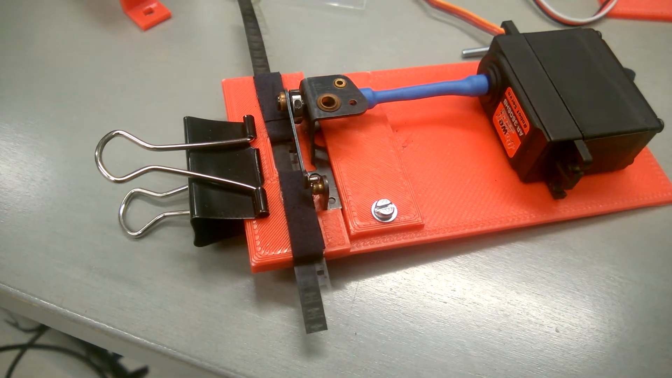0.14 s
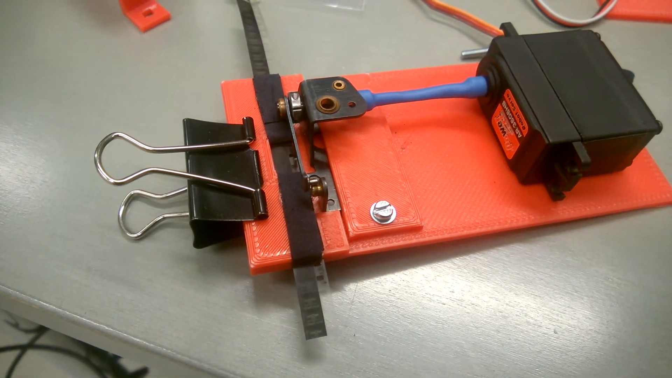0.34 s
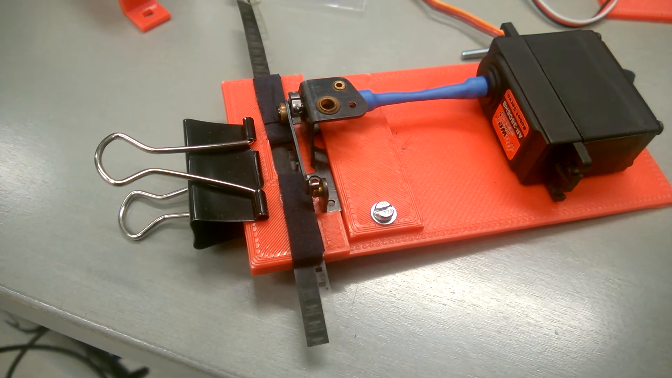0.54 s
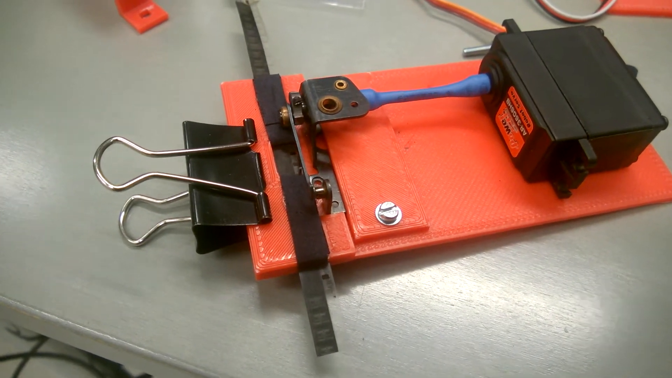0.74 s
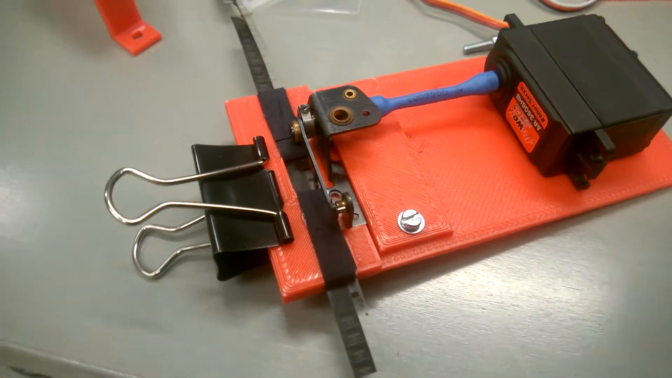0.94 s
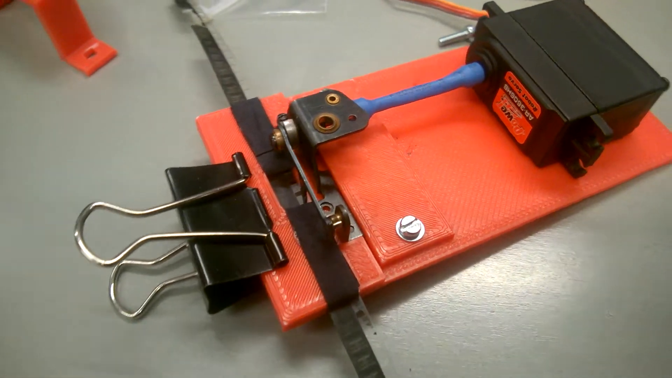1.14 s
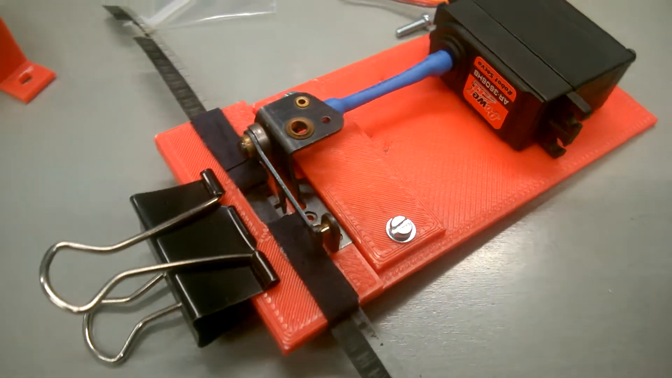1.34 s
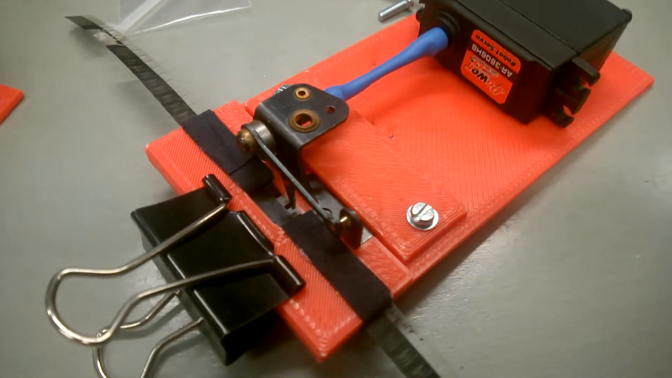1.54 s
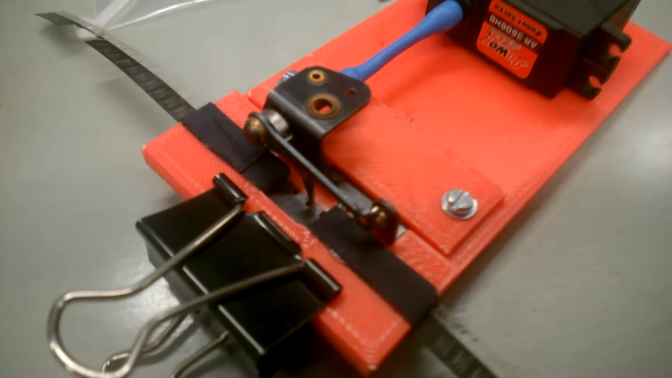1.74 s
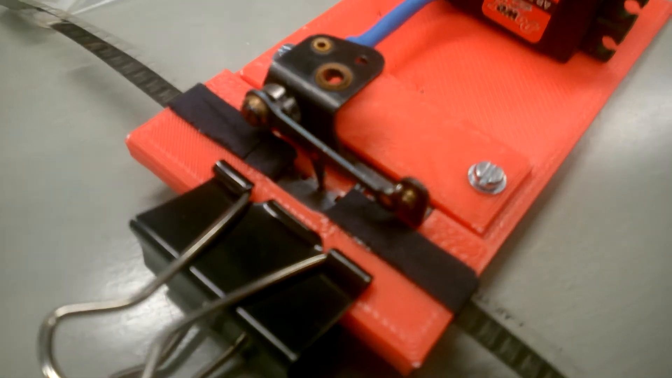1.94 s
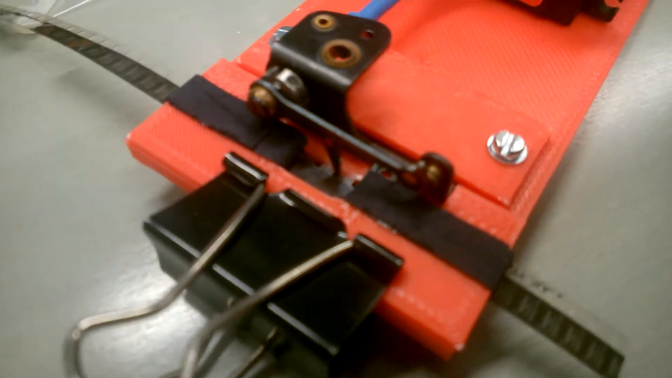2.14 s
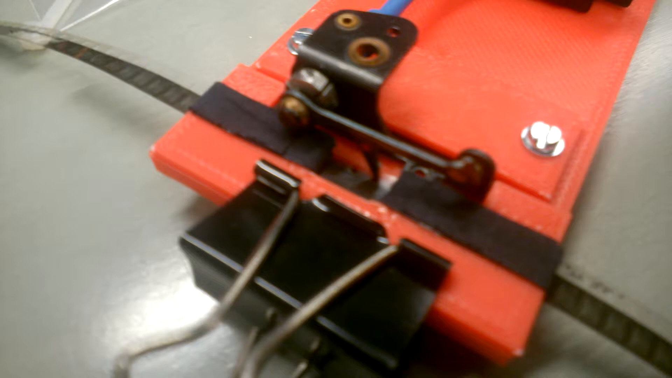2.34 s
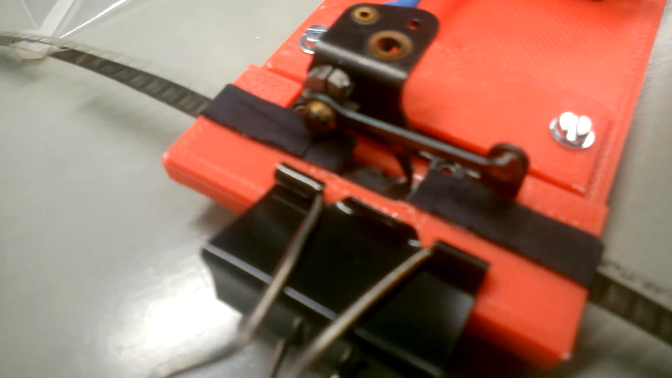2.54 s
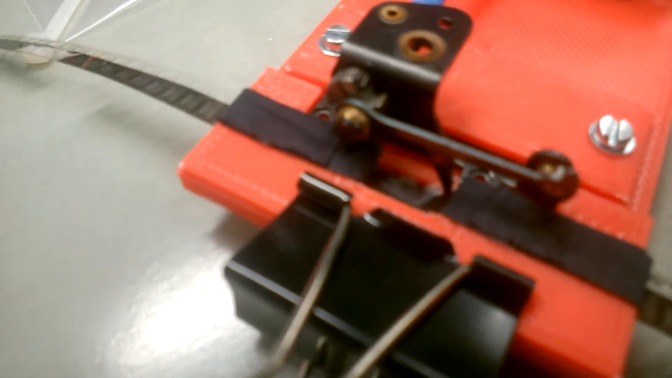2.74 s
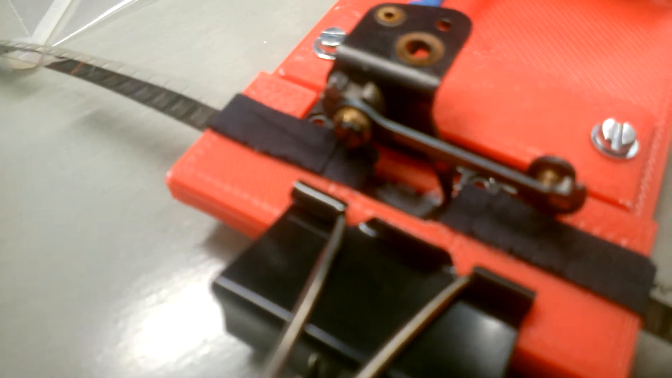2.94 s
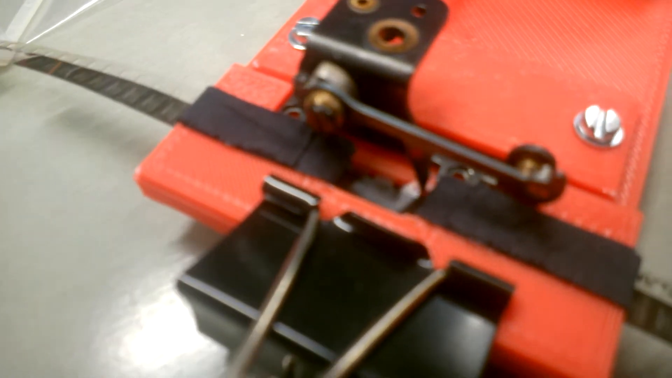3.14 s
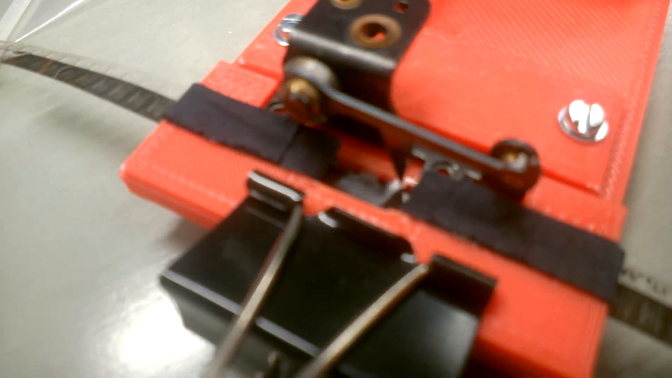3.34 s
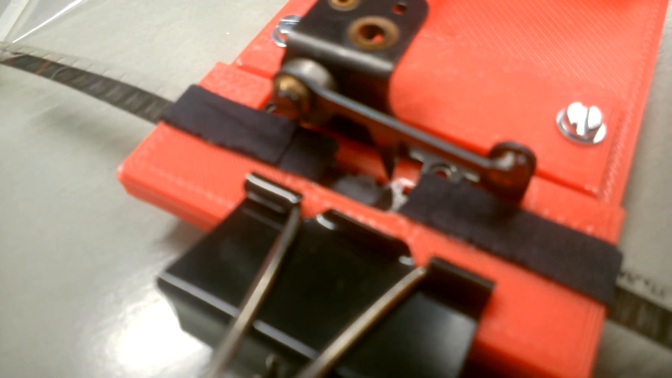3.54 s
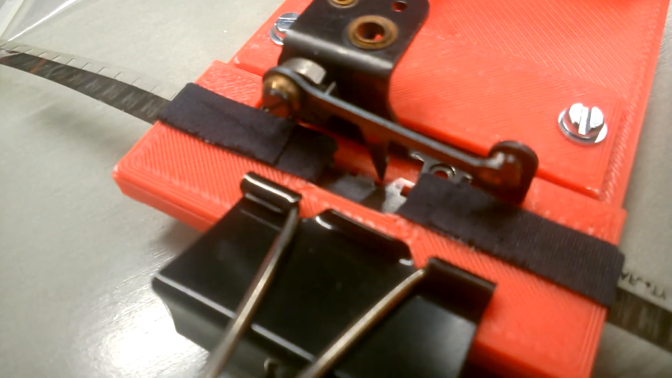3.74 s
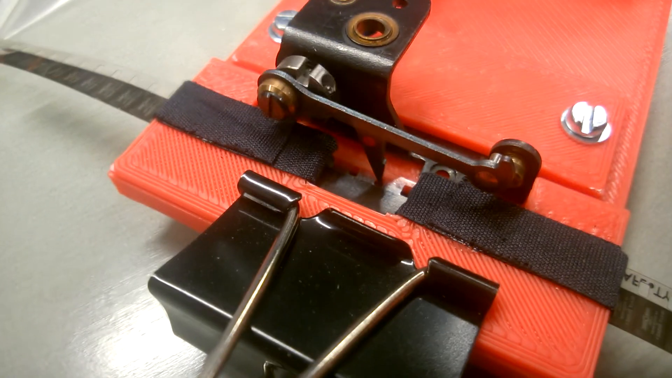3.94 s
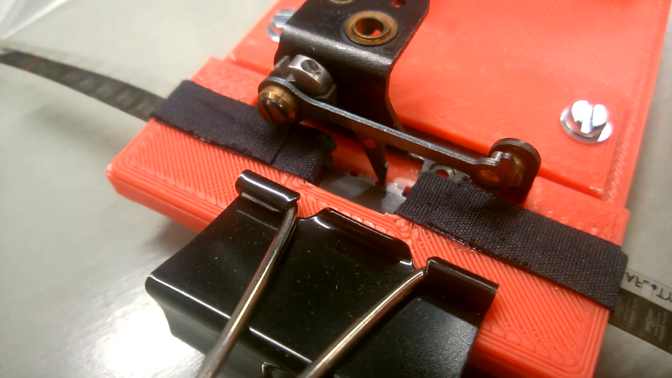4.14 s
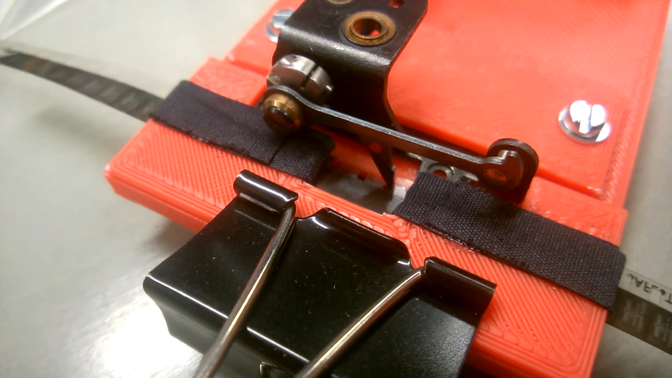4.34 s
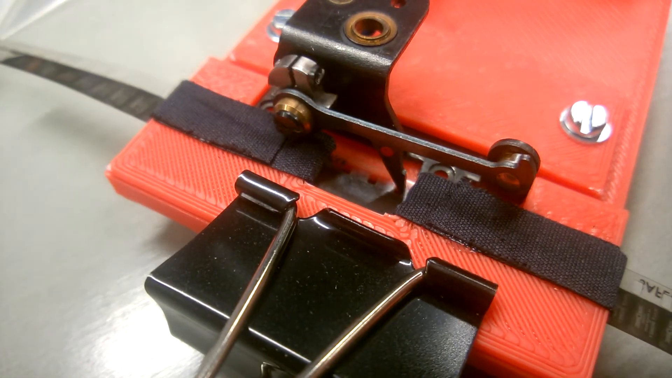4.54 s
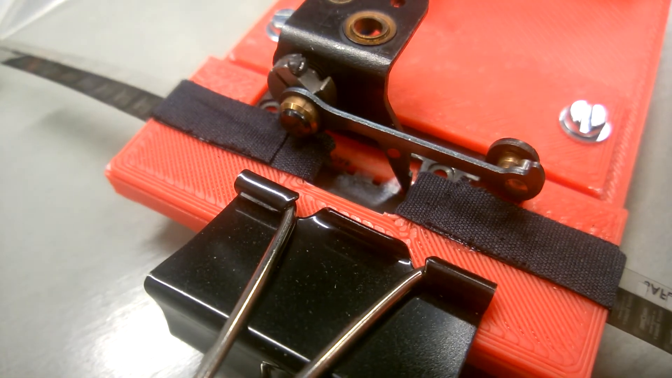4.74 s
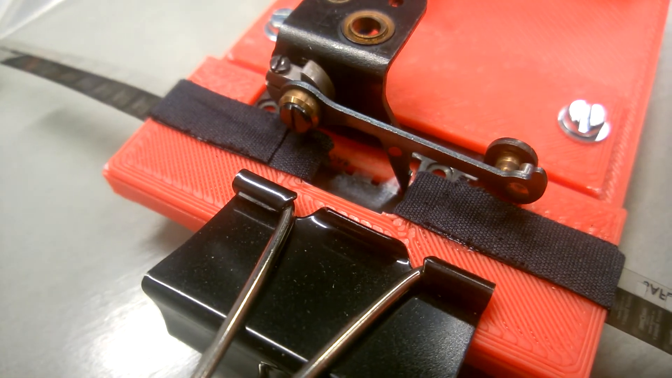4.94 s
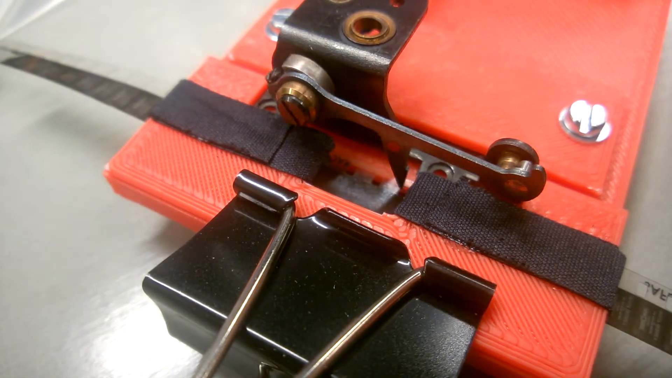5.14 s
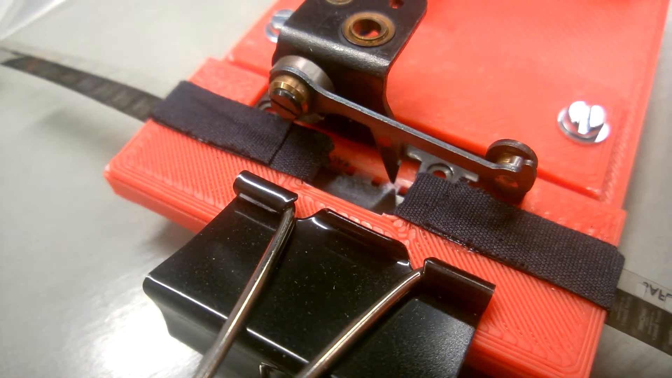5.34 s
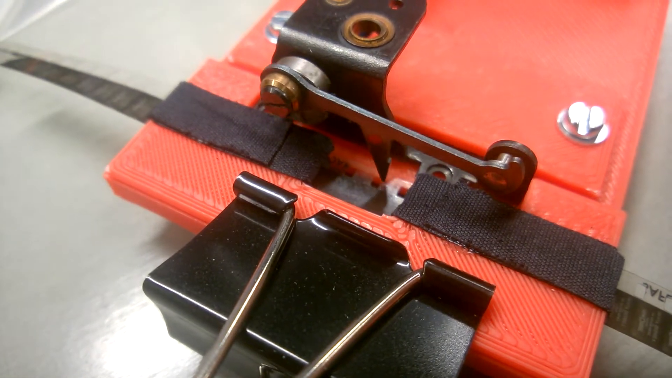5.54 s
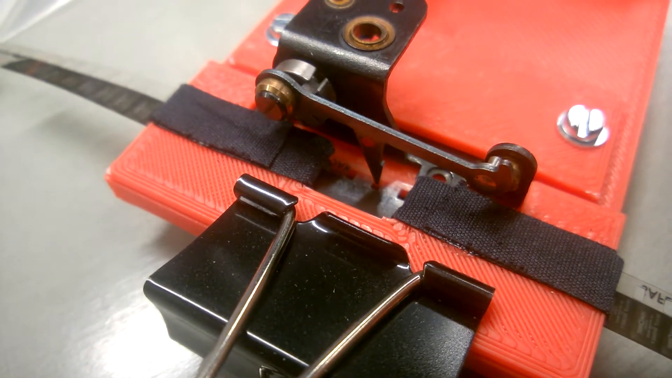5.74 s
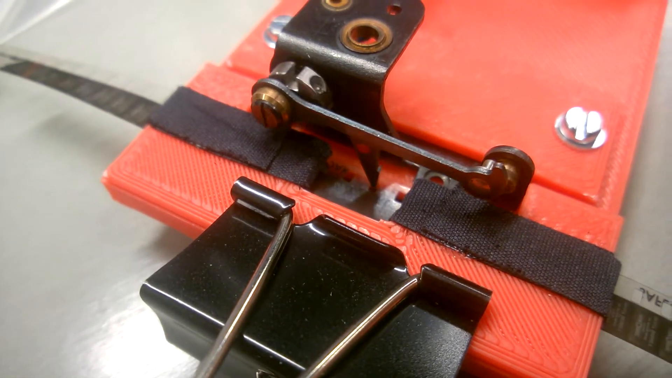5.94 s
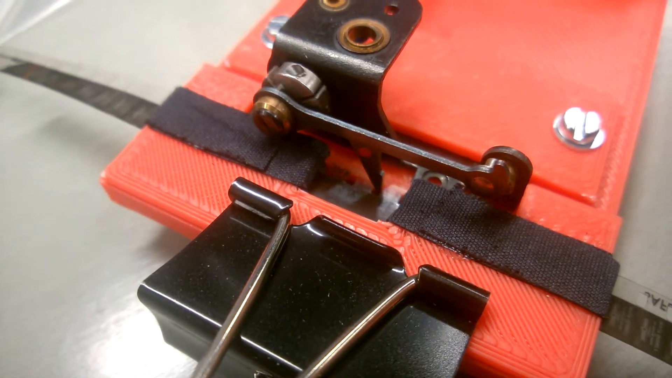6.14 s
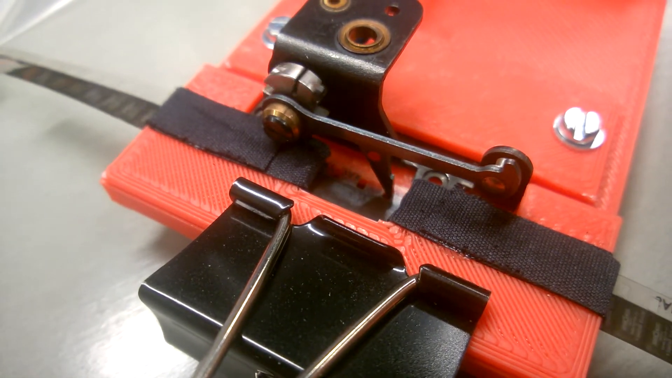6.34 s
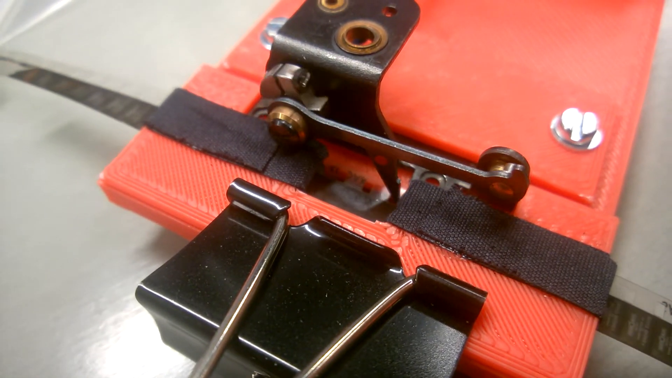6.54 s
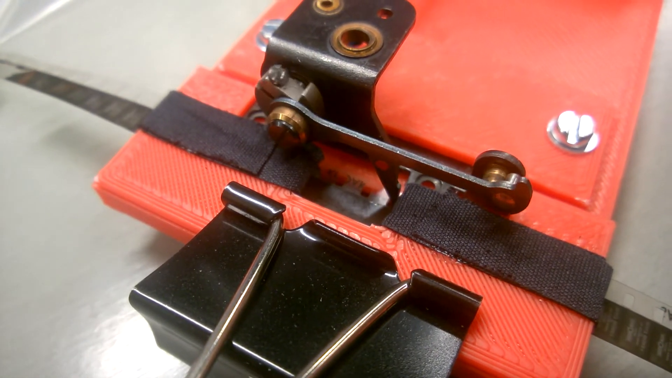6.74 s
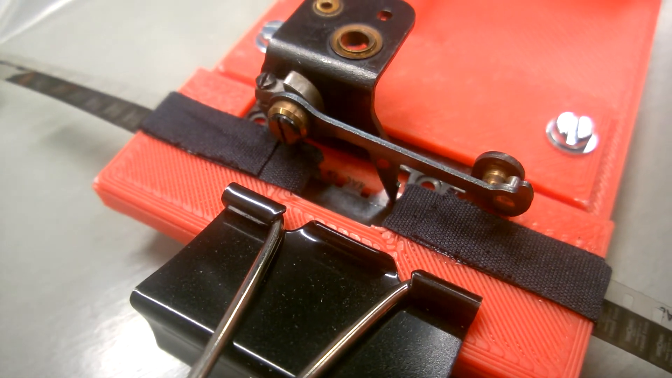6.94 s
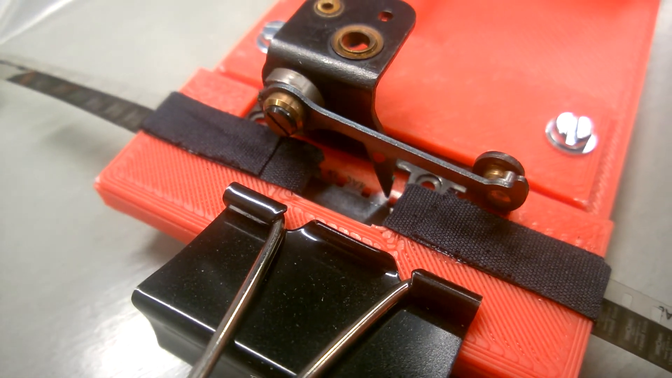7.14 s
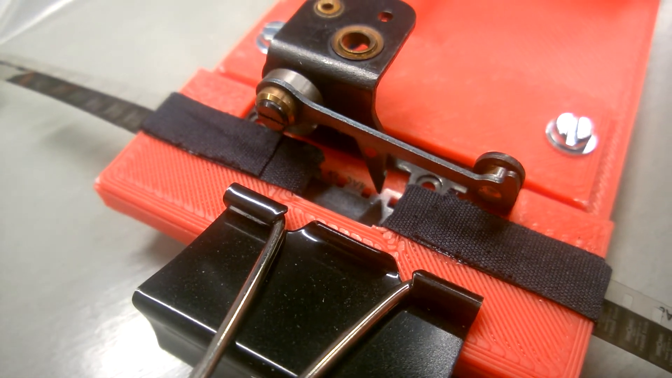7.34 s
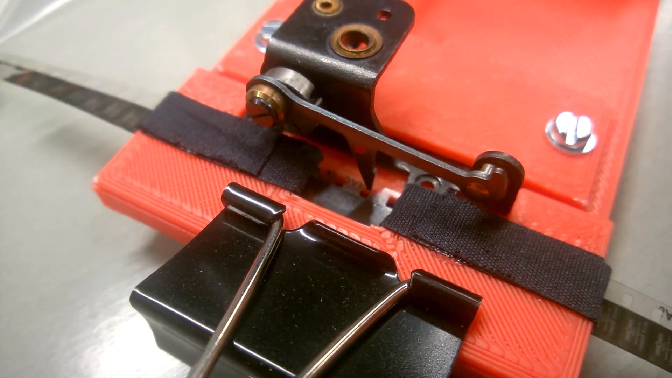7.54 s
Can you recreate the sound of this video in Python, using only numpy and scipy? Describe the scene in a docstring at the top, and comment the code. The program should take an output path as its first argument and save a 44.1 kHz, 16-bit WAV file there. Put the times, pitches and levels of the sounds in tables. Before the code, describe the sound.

A small geared motor whirs continuously with a bright, raspy plastic buzz over low ventilation rumble, growing closer amid a few creaks and handling clicks.

```python
"""A distant gear whirr over ventilation rumble, then the same whirr close up, with a few rubs and creaks of the
grip. A small servo turns a linkage on a workbench: tooth blows of a 12-tooth pinion on a 47-tooth wheel, and a
steady grind, ring the modes of a plastic case. A hand-held pair of microphones swings round and comes close.
Clicks and friction noise ring the housing modes under the hand; the room air is coloured noise in layers, with
low swells rising through it now and then."""
import sys
import numpy as np
from scipy import signal
from scipy.fft import rfft, irfft, next_fast_len
from scipy.io import wavfile
from scipy.ndimage import uniform_filter1d

SR = 44100
rng = np.random.default_rng(int(sys.argv[2]) if len(sys.argv) > 2 else 0)


def store_pcm(level_fs):
    """Save levels as 16-bit WAV."""
    pcm = np.round(np.clip(level_fs, -1, 1) * 32767).astype(np.int16)
    wavfile.write(sys.argv[1], SR, np.atleast_2d(pcm).T)


N = 334719


def from_db(db):
    """dB to gain."""
    return 10 ** (np.asarray(db) / 20)


def rms_one(x):
    """Scale to rms 1."""
    return x / np.sqrt(np.mean(x ** 2) + 1e-20)


def in_time(rows):
    """Columns of a table, after its seconds, drawn as lines over every sample."""
    s, *columns = np.transpose(rows)
    return [np.interp(np.arange(N) / SR, s, c) for c in columns]


def resonate(x, hz, width_hz):
    """Complex one-pole resonance, gain 1 on top; a wider one dies away faster."""
    r = np.exp(-np.pi * width_hz / SR)
    return signal.lfilter([1 - r], [1, -r * np.exp(2j * np.pi * hz / SR)], x)


# Stereo image of the air. Each row: frequency in Hz, likeness of the two ports 0-1, left over right in dB.
PORT_IMAGE = [(30, 0.99, -7), (125, 0.95, -4), (300, 0.85, -6.5), (590, 0.68, -5.5), (1500, 1, -12.5)]


def air_noise(spectrum):
    """Stereo noise of a given colour, the likeness of the ports set by frequency; mid rms 1."""
    size = next_fast_len(N)
    log_hz = np.log(np.maximum(np.arange(size // 2 + 1) * SR / size, 1))
    hz, level_db = np.transpose(spectrum)
    port_hz, alike, pan_db = np.transpose(PORT_IMAGE)
    alike = np.interp(log_hz, np.log(port_hz), np.clip(alike, 0, 1))
    left_right = np.array([[1], [-1]])
    pan = from_db(np.interp(log_hz, np.log(port_hz), pan_db) / 2 * left_right)
    mid, side = rfft(rng.standard_normal((2, size)))
    both = pan * (np.sqrt(1 + alike) * mid + np.sqrt(1 - alike) * side * left_right)
    colour = from_db(np.interp(log_hz, np.log(hz), level_db, left=-90, right=-90))
    out = irfft(both * colour, size)[:, :N]
    return out / np.sqrt(np.mean(out.mean(axis=0) ** 2))


# Swells that rise through the low sound now and then. Each row: middle in seconds, then rumble, low air and
# middle air in dB, added in power to the floor.
AIR_SWELLS = [(.08, -50, -43, -59), (.42, -45, -46, -70), (.74, -59, -45.5, -57.5), (1.25, -60, -46.5, -77),
              (1.75, -42.5, -45.5, -57), (2.09, -64, -69, -55), (2.33, -43, -52, -62),
              (2.72, -43, -47.5, -78), (3.21, -43.5, -70, -76), (3.81, -32.5, -46.5, -58),
              (4.42, -43, -45.5, -59), (4.87, -43.5, -46.5, -75), (5.06, -54, -49.5, -84),
              (5.35, -47.5, -64, -85), (5.82, -38, -53, -79), (6.1, -43, -44, -59.5),
              (6.36, -40, -60, -55.5), (6.75, -46.5, -47.5, -72), (7.08, -45, -55, -66),
              (7.58, -49, -45, -76)]
SWELL_WIDTH_S = 0.065
RUMBLE_DB, LOW_AIR_DB, MIDDLE_AIR_DB = -48.5, -51, -61.5   # floors between swells, before wavering
SHARED_WAVER_DB, OWN_WAVER_DB, WAVER_PER_S = 1.5, 1.8, 4.7   # all layers together, each on its own


def air_levels():
    """Gains of rumble, low and middle air: a wavering floor with bell-shaped swells."""
    step = 100   # samples between drawn points
    s, *tops_db = np.transpose(AIR_SWELLS)
    t = np.arange(0, N + step, step) / SR
    bells = np.exp(-((t - s[:, None]) / SWELL_WIDTH_S) ** 2)
    r = np.exp(-2 * np.pi * step * WAVER_PER_S / SR)
    drift = signal.lfilter([1], [1, -2 * r, r * r], rng.standard_normal((4, len(t) + 500)))
    waver = rms_one(drift[:, 500:])   # the filter has settled by then
    floors_db = np.c_[[RUMBLE_DB, LOW_AIR_DB, MIDDLE_AIR_DB]]
    floors = from_db(floors_db + SHARED_WAVER_DB * waver[0] + OWN_WAVER_DB * waver[1:])
    gains = np.sqrt(floors ** 2 + from_db(tops_db) ** 2 @ bells)
    return [np.interp(np.arange(N) / SR, t, gain) for gain in gains]


# Colour of the room air, lower part. Each row: frequency in Hz, relative density in dB per Hz.
AIR_COLOUR = [(41, -11), (70, -1.5), (90, -8.5), (106, -2.5), (118, 4.5), (132, -5), (146, -16),
              (163, -5.5), (180, -12.5), (200, -18.5), (255, -14), (290, -18.5), (376, -28.5), (415, -24.5),
              (469, -26), (648, -33), (732, -33.5), (1000, -36.5)]
# Its upper part. Each row: frequency in Hz, relative density in dB per Hz.
AIR_TOP_COLOUR = [(1300, -36.5), (2500, -45), (6000, -40)]
# Colour of the deep rumble. Each row: frequency in Hz, relative density in dB per Hz.
DEEP_COLOUR = [(8, -37), (14, -13), (27, 2.5), (34, -13), (47, 0), (60, -20.5), (75, -11.5), (95, -40)]


def room_air():
    """A deep ventilation rumble with low and middle layers of air; swells rise through them now and then, each
    layer to its own level."""
    rumble_gain, low_gain, middle_gain = air_levels()
    air = air_noise(AIR_COLOUR + AIR_TOP_COLOUR)
    low = signal.sosfiltfilt(signal.butter(2, 210, fs=SR, output="sos"), air)
    rumble = rumble_gain * air_noise(DEEP_COLOUR)
    return low_gain * rms_one(low) + middle_gain * rms_one(air - low) + rumble


# Fingers sliding on the housing. Each row: middle in seconds, half length in seconds,
# level in dB before the housing rings.
FINGER_RUBS = [(0.095, 0.049, -71.5), (0.354, 0.028, -69.5), (0.794, 0.066, -70.5), (1.773, 0.16, -69.5),
               (2.043, 0.24, -68.5), (3.962, 0.046, -70)]
RUB_CUT_HZ = 470


def rubbing():
    """Dull friction noise under a bell for each slide of the fingers."""
    t = np.arange(N) / SR
    gain = sum(from_db(level_db) * np.exp(-((t - s) / half_s) ** 2) for s, half_s, level_db in FINGER_RUBS)
    return gain * signal.sosfilt(signal.butter(2, RUB_CUT_HZ, fs=SR, output="sos"), rng.standard_normal(N))


# Grip creaks. Each row: start in seconds, strike level in dB, thump over the strike in dB,
# dullness in dB per octave (positive favours the lower modes).
GRIP_CREAKS = [(.355, -52, -8, 10), (.742, -52, -4, 8), (.79, -50, -4, 13), (0.838, -40, -5, -4),
               (.925, -50, -5, 7), (1.933, -33.5, 0, 1), (2.0045, -32.5, -14, -1), (2.058, -36, -14, -6),
               (2.0744, -30, -2, -3), (2.1003, -30.5, -8, -2), (2.107, -32, -15, -2),
               (2.1155, -31, -19, -1.5), (2.1204, -40, -4, -7), (2.307, -41.5, 13, 0),
               (2.392, -53, -10, -4), (2.604, -44, -3, -3), (3.916, -52, -7, -3)]
# Housing modes. Each row: frequency in Hz, t60 in seconds, left in dB, right in dB,
# right polarity as a sign, lag in seconds.
HOUSING_MODES = [(455, 0.017, -2.5, -19, -1, 0.00093), (680, 0.016, -4.5, -12, -1, 0.0031),
                 (930, 0.012, -8, 1.5, 1, 0.002), (1135, 0.013, -1, -9, 1, 0.0017),
                 (1800, 0.0059, -5, -3.5, 1, 0)]
THUMP_HZ, THUMP_T60_S = 91, 0.032


def grip():
    """Creaks click into the housing modes, most of them answering late, with a thump; sliding fingers ring them too."""
    s, strike_db, thump_db, dull_db = np.transpose(GRIP_CREAKS)
    out, rub = np.zeros((2, N)), rubbing()
    modes = HOUSING_MODES + [(THUMP_HZ, THUMP_T60_S, 0, 0, 1, 0)]
    for hz, t60_s, left_db, right_db, polarity, lag_s in modes:
        clicks = np.full(N, 1e-18)
        colour_db = dull_db * np.log2(900 / hz) + rng.normal(0, 2.5, len(s))
        at = np.round((s + abs(lag_s)) * SR).astype(int)
        if hz == THUMP_HZ:
            clicks[at] = from_db(strike_db + thump_db)
        else:
            clicks[at] = -from_db(strike_db + colour_db)
        r, w = from_db(-60 / (t60_s * SR)), 2 * np.pi * hz / SR
        ringing = signal.lfilter([0, np.sin(w)], [1, -2 * r * np.cos(w), r * r], clicks + rub)
        out += ringing * from_db([[left_db], [right_db]]) * [[1], [np.sign(polarity)]]
    return out


# Spells when the motor labours at its lower speed. Each row: start in seconds, length in seconds.
LABOURED_SPELLS = [(.28, .17), (.8, .87), (2.18, .42), (2.78, .32), (4.07, .53), (5.22, .1), (6.55, .24)]
FREE_TEETH_PER_S, LABOURED_TEETH_PER_S, FIRST_TOOTH = 244, 240, 0.15


def teeth_meshed():
    """Times where the motor changes between its two speeds, and the teeth meshed by then."""
    start_s, length_s = np.transpose(LABOURED_SPELLS)
    s = np.sort(np.r_[0, start_s, start_s + length_s, N / SR])
    slow_s = np.clip(s[:, None] - start_s, 0, length_s).sum(axis=1)
    return s, FIRST_TOOTH + FREE_TEETH_PER_S * (s - slow_s) + LABOURED_TEETH_PER_S * slow_s


# Hardness of the pinion teeth. Each entry: one tooth in turn, in dB before the hardest level off.
PINION_HARDNESS = [-0.5, 1, 0.5, 1.5, -1, 3.5, 5, 3, 2, -0.5, -0.5, -0.5]
# One contact, the blow and its rebounds. Each row: delay in seconds, scatter of the delay in seconds,
# level in dB.
BLOW_AND_REBOUNDS = [(0, .00027, 0), (.0011, .0003, -1.5), (.0022, .0004, -11)]
# Single teeth that jam and land hardest. Each row: time in seconds, aimed peak in dB.
JAMMED_TEETH = [(2.1545, -9), (2.5212, -10), (2.7214, -9), (2.7762, -10), (2.9017, -12), (2.9517, -7),
                (3.0615, -8), (3.1216, -8.5), (3.1712, -11), (3.2695, -9.5), (3.5135, -8), (4.1054, -8.5),
                (4.9016, -5), (5, -6.5), (5.0473, -6.5), (5.0982, -7), (6.4279, -8.5), (6.6245, -11.5),
                (6.776, -13), (6.8248, -11)]
# Gear whirr as the microphones come close. Each row: time in seconds, level in dB.
WHIRR_LEVEL = [(0, -33.5), (.8, -34), (1.15, -31.5), (1.7, -28.5), (2.2, -26.5), (2.75, -27), (3.4, -28.5),
               (4.7, -28), (5.5, -28.5), (7.59, -28.5)]
WHEEL_TEETH, WHEEL_TIGHTEST, WHEEL_DB = 47, 12, 2   # the wheel runs off centre
RENUMBER_S, RENUMBER_TEETH = 2.38, 7   # tooth numbering moves on by seven here, keeping the wheel's beat steady
HARDEST_DB = 5   # the hardest contacts, jams apart, level off towards this
TOOTH_CREST_DB = 13.5   # assumed peak of a mean tooth over the level of the whirr
BEFORE_JAM_DB = -3.5   # the tooth before a jam lands a little softer


def tooth_contacts(spread_db, wander_db):
    """Sample and size of every blow and rebound, one row per tooth; an off-centre wheel meshes harder once a turn."""
    s, meshed = teeth_meshed()
    teeth = np.arange(np.ceil(meshed[0]), np.floor(meshed[-1]))
    start_s = np.interp(teeth - .2, meshed, s)
    index = (teeth + RENUMBER_TEETH * (start_s > RENUMBER_S)).astype(int)
    wheel_db = WHEEL_DB * np.cos(2 * np.pi * (index - WHEEL_TIGHTEST) / WHEEL_TEETH)
    delay_s, jitter_s, step_db = np.transpose(BLOW_AND_REBOUNDS)
    chance = np.clip(rng.standard_normal((len(teeth), 3, len(BLOW_AND_REBOUNDS))), -1.6, 1.6)
    wander = rms_one(signal.lfilter([1], [1, -.8], chance[:, 2, 0]))   # backlash wanders over a few teeth
    hard_db = np.array(PINION_HARDNESS)[index % len(PINION_HARDNESS)] + wheel_db + wander_db * wander
    hard_db = np.minimum(hard_db, HARDEST_DB * np.tanh(hard_db / HARDEST_DB))

    # the nearest tooth takes over the time and size of each jam
    jolt_s, jolt_db = np.transpose(JAMMED_TEETH)
    jammed = np.abs(start_s[:, None] - jolt_s).argmin(axis=0)
    start_s[jammed] = jolt_s
    hard_db[jammed] = jolt_db - TOOTH_CREST_DB - np.interp(jolt_s, *np.transpose(WHIRR_LEVEL))
    hard_db[jammed - 1] += BEFORE_JAM_DB
    chance[jammed, :2, 0] = 0   # no scatter in time or size on its first blow

    at = (start_s[:, None] + delay_s + jitter_s * chance[:, 0]) * SR
    size_db = hard_db[:, None] + step_db + spread_db * chance[:, 1]
    return np.clip(at, 0, N - 1).astype(int), from_db(size_db)


def in_step(x, reply):
    """Phases set so that a blow with this reply gives its energy as early as it can (minimum phase)."""
    spectrum = rfft(reply) + 1e-9
    cepstrum, half = irfft(np.log(np.abs(spectrum))), len(reply) // 2
    cepstrum[1:half] *= 2
    cepstrum[half + 1:] = 0
    early_phase = rfft(cepstrum).imag
    turn = np.roll(irfft(np.exp(1j * (early_phase - np.angle(spectrum)))), half)
    return signal.fftconvolve(x, turn[None], axes=1)[:, half:half + N]


# Passing dips in the whirr, some of them gliding. Each row: middle in seconds, half length in seconds,
# frequency at the middle in Hz, glide in Hz per second, width in Hz, depth 0-1.
PASSING_DIPS = [(1.5, 0.52, 5360, -150, 300, .75), (1.74, 0.43, 8200, 300, 240, .65),
                (2.34, 0.13, 7400, 4, 1000, 0.77), (1.2, 0.75, 7600, 0, 180, 0.13)]


def passing_dips(x):
    """Each dip is a notch that fades in and out, its frequency moving at its own glide rate."""
    t = np.arange(N) / SR
    for s, half_s, hz, glide, width_hz, depth in PASSING_DIPS:
        carrier = np.exp(2j * np.pi * (hz * t + glide * (t - s) ** 2 / 2))
        band = 2 * (resonate(x / carrier, 0, width_hz) * carrier).real
        fade = np.exp(-((t - s) / half_s) ** 4)
        x = x - np.clip(depth, 0, 1) * fade * band
    return x


# Modes of the case and base plate. Each row: frequency in Hz, width in Hz of the first resonance pass.
CASE_MODES = [(1125, 115), (2070, 310), (2430, 120), (2710, 230), (3450, 300), (3720, 450), (4300, 540),
              (4970, 570), (5840, 410), (6310, 260), (6650, 330), (7280, 420), (7850, 620), (8700, 710),
              (9220, 370), (9570, 660), (10360, 700), (11720, 600), (12320, 890), (13480, 780)]
# The case modes heard from far off. Each row, one per mode: left in dB, right in dB, right lead in radians.
FAR_MODES = [(-31, -36, 1), (-18.5, -21, -1.6), (-5.5, -12.5, 1), (-4.5, -14, -1.5), (-3, -14.5, 2.5),
             (-13.5, -30, 3.5), (-7, -31, 2), (-12, -7.5, -2.5), (-6.5, -6, -2.5), (-17, -5, 2),
             (-2.5, -17, -0.5), (-3.5, 2.5, 4), (-22, -0.5, 2.5), (-17, -8.5, -0.0), (-10.5, -15, -2),
             (-22, -10.5, 1.1), (-34, -41, -1), (-49, -34, -0.9), (-39, -26, -1.5), (-54, -37, 0.5)]
# The same while swinging round. Each row: left in dB, right in dB, right lead in radians.
SWINGING_MODES = [(-37, -32.5, 3.7), (-20.5, -28, -2), (-4, -14, 1.5), (-6.5, -19.5, -2), (-5, -22, 7.5),
                  (-14.5, -33, 4), (-4, -15, 1.3), (-6, -11.5, 4.5), (-24, -11, -2.5), (-4, -9, 3.5),
                  (1.5, -9, -3.5), (-3.5, -29, 2), (-23, -7, -0.5), (-13, -22, 2), (-14.5, -21, 0.5),
                  (-23, -36, -2), (-59, -23.5, 1.5), (-40, -36, 4), (-59, -72, -3.5), (-65, -67, -2)]
# The same on arriving. Each row: left in dB, right in dB, right lead in radians.
ARRIVING_MODES = [(-29.5, -30.5, 1), (-28, -27.5, 0.5), (-9, -11.5, -0.7), (-6, -15, -1), (-6.5, -19, 1.1),
                  (-22, -27, -0.5), (-5.5, -14, 1.5), (-4.5, -22, 2.8), (-15, -2.5, 0.88), (1, -3.5, 0.5),
                  (-2, -1.5, 1.44), (1, 0, -1.5), (-9.5, -33, 2.5), (-13.5, -8.5, 1.5), (-7, -12.5, 2),
                  (-21, -11, 3.6), (-13.5, -27, 4), (-23, -20, 1.3), (-27, -32, 0.5), (-34.5, -30, 4)]
# The same close up. Each row: left in dB, right in dB, right lead in radians.
NEAR_MODES = [(-26, -27, 0.58), (-27.5, -24.5, -0.5), (-7, -12, -0.6), (-4.5, -15.5, 0.5),
              (-5.5, -16.5, 0.8), (-13.5, -22.5, 0), (-3.5, -16.5, 3), (-4.5, -14, -1), (-8, -2.5, -1),
              (0, 0, -1.67), (-4.5, -4.5, -0.5), (0, -1.5, -2), (-10, -12, -1.56), (-12.5, -7.5, 0),
              (-36, -12, -3.5), (-14.5, -25, 1.8), (-21, -21.5, -1), (-23.5, -23.5, 0.24), (-27, -26.5, -3),
              (-27.5, -34, 3)]
# Path of the microphones. Each row: time in seconds, place (0 far, 1 swinging, 2 arriving, 3 near).
MICROPHONE_PATH = [(0, 0), (.8, .05), (1.1, .35), (1.45, 1), (1.8, 1.05), (2.1, 1.45), (2.35, 2), (3.0, 2),
                   (3.3, 3), (7.6, 3)]
# Narrow dips between case modes. Each row: frequency in Hz, width in Hz, left depth 0-1, right depth 0-1.
CASE_NOTCHES = [(2293, 185, 0.63, 0.47), (2540, 33, 0.57, 0.8), (3000, 91, 0, 0.5), (4810, 223, 0.76, 0.37),
                (6696, 114, 0.73, 0.03), (7100, 175, 0.18, 0), (11080, 280, 0.4, 0.74)]
HOLLOW_HZ, HOLLOW_WIDTH_HZ, HOLLOW_DEPTH = 1620, 230, 0.7   # the base plate radiates little here
# the whirr under 3 kHz arches up and drops back once per slow turn of the gear train
ARCH_PERIOD_S, ARCH_START_S, ARCH_FOOT_DB, ARCH_DB = 1.927, 1.805, -3.5, 5.5
LOWEST_PATCHY_SHARE = 1.6   # the lowest mode comes and goes more than the others


def gears(grind_db, own_grind_db, colour_db, patchy_db, skirt, lowest_db):
    """Tooth blows and a steady grind ring the case; each port hears each mode in its own way."""
    at, sizes = tooth_contacts(spread_db=2.0, wander_db=0.84)
    level_db, = in_time(WHIRR_LEVEL)
    place, = in_time(MICROPHONE_PATH)
    slow_turns = (np.arange(N) / SR - ARCH_START_S) / ARCH_PERIOD_S
    arch_db = ARCH_FOOT_DB + ARCH_DB * np.abs(np.sin(np.pi * slow_turns))
    places = np.array([FAR_MODES, SWINGING_MODES, ARRIVING_MODES, NEAR_MODES])
    grind = from_db(grind_db) * rng.standard_normal((2, N))   # neighbouring modes get unrelated noise
    # steady noise ringing the case, unrelated at the two ports
    own_grind = from_db(own_grind_db) * rng.standard_normal((2, 2, N))
    out, replies, click = np.zeros((2, N)), 0, signal.unit_impulse(4096)

    for k, (hz, width_hz) in enumerate(CASE_MODES):
        lowest, sign = k == 0, (-1) ** k

        def ring(x):
            """Two passes: the second, wider one keeps the valleys between modes dark."""
            return resonate(resonate(x, hz, width_hz), hz, skirt * width_hz)

        fast, slow = rng.uniform(-1.7, 1.7, (2, len(at)))
        patches = rms_one(uniform_filter1d(slow, size=15))   # each mode comes and goes
        if lowest:
            patches = patches * LOWEST_PATCHY_SHARE
        blows = grind[k % 2].copy()
        np.add.at(blows, at, sizes * from_db(colour_db * fast + patchy_db * patches)[:, None])
        ringing = ring(blows + own_grind[k % 2])

        # blows are sharpest at the left port; from far off, in both ports together
        ports = from_db(places[:, k, 0]).astype(complex)
        ports[0] += from_db(places[0, k, 1]) * np.exp(1j * places[0, k, 2])
        replies = replies + sign * (ports[:, None] * ring(click)).real

        columns = places[:, k, 0], places[:, k, 1], np.unwrap(places[:, k, 2])
        left_db, right_db, lead = (np.interp(place, np.arange(len(places)), c) for c in columns)
        # the lowest mode has an extra level of its own
        lift_db = arch_db * (hz < 3000) + lowest_db * lowest
        out[0] += sign * from_db(left_db + lift_db) * ringing[0].real
        out[1] += sign * from_db(right_db + lift_db) * (ringing[1] * np.exp(1j * lead)).real

    nearest = np.round(place)
    out = sum((nearest == p) * in_step(out, reply) for p, reply in enumerate(replies))
    out -= HOLLOW_DEPTH * 2 * resonate(out, HOLLOW_HZ, HOLLOW_WIDTH_HZ).real
    for hz, width_hz, *depth in CASE_NOTCHES:
        out -= np.c_[depth] * 2 * resonate(out, hz, width_hz).real
    return from_db(level_db) * rms_one(passing_dips(out))


def scene():
    """Room air, grip and gears."""
    whirr = gears(grind_db=-29.0, own_grind_db=-28.0, colour_db=2.21, patchy_db=1.26, skirt=2.61, lowest_db=3.5)
    return room_air() + grip() + whirr


def record(dry):
    """The top is cut steeply, 70 dB down from 15.7 kHz."""
    return signal.sosfilt(signal.cheby2(12, 70, 15700, fs=SR, output="sos"), dry)


dry = scene()
out = record(dry)
store_pcm(out)
```